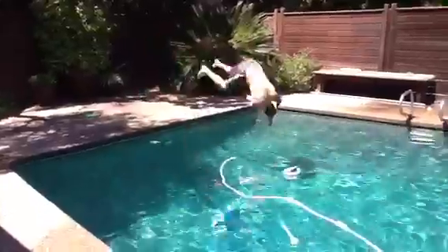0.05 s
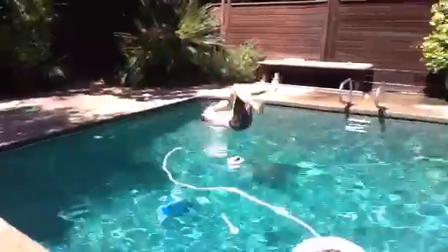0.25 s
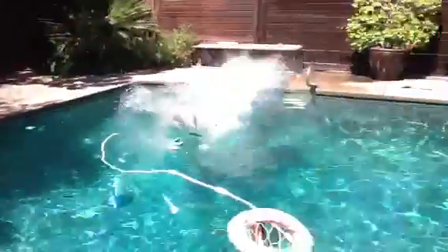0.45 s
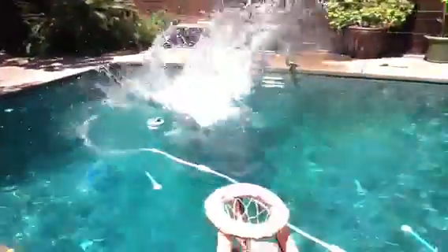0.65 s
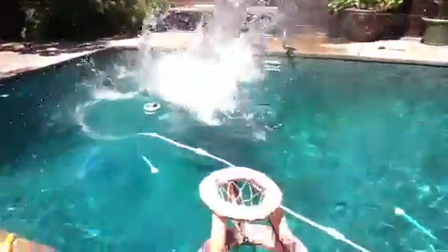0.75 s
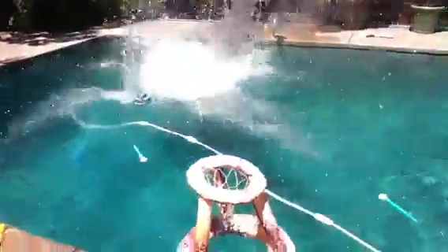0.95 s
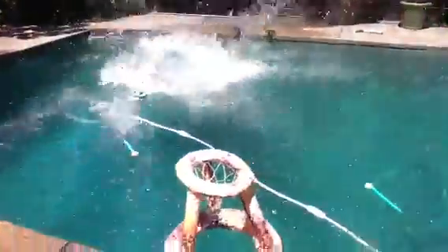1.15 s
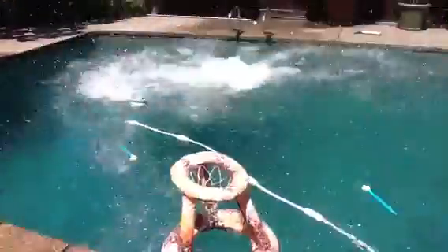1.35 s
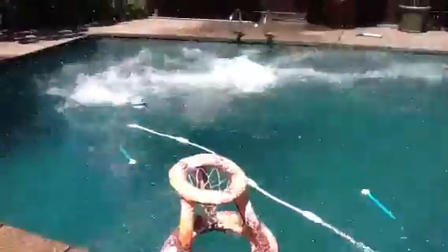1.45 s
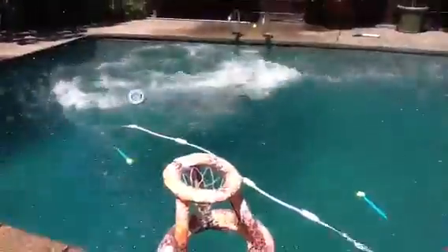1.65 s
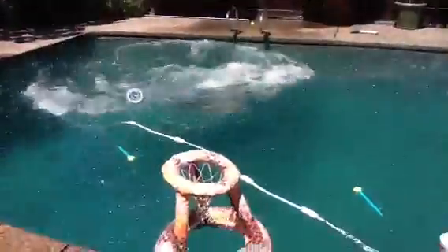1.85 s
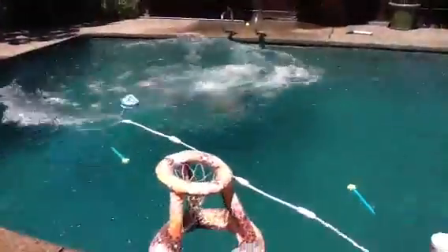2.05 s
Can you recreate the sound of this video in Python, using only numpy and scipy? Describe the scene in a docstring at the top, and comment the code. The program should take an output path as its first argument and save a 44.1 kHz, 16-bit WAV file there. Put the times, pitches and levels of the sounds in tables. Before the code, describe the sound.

A body plunges into an outdoor pool with a sharp slap, bursting splash and low gulps

```python
"""A body drops into an outdoor pool: a sharp slap, a tearing burst as the surface opens, then low gulps.
The slap is a very short pulse with a rattle; the burst and the spray raining back are crowds of tiny rings.
The closing cavity and the fizzing foam are crowds of longer rings; gulps are single tones gliding upward.
Splats and ticks, faint to loud, are puffs of noise through a resonance; a near wall echoes them and the slap.
Faint gurgles come before the plunge, over a quiet outdoor hush; both channels are alike."""
import sys
import numpy as np
from scipy import signal
from scipy.fft import rfft, irfft
from scipy.io import wavfile

SR = 44100
rng = np.random.default_rng(int(sys.argv[2]) if len(sys.argv) > 2 else 0)


def output_pcm(signal):
    """Save a mono or channel-first signal as 16-bit PCM at the path in sys.argv[1].

    Samples are clipped to [-1, 1] before scaling.
    """
    pcm = np.clip(np.atleast_2d(signal).T, -1, 1) * 32767
    wavfile.write(sys.argv[1], SR, np.round(pcm).astype(np.int16))


N = 92610  # samples, 2.1 s


def from_db(db):
    """Turn decibels into a gain."""
    return 10 ** (np.asarray(db) / 20)


def rms_one(x):
    """Scale a sound to an average (rms) strength of 1."""
    return x / np.sqrt(np.mean(x ** 2) + 1e-20)


def in_time(rows):
    """Draw smooth curves from table columns; the level is near silence before the first row."""
    s, level, *rest = np.transpose(rows)
    t = np.arange(N) / SR
    level_curve = np.interp(t, s, level, left=-120)
    return [level_curve] + [np.interp(t, s, column) for column in rest]


def at_hz(points, hz):
    """Read a spectrum table at any pitch, with pitch on a log scale."""
    table_hz, table_db = np.array(points).T
    return np.interp(np.log(hz), np.log(table_hz), table_db)


def drift(rate_hz):
    """Slow random wandering of spread 1: noise smoothed twice, worked out every 40 samples."""
    r = np.exp(-2 * np.pi * rate_hz * 40 / SR)
    noise = rng.standard_normal(N // 40 + 2002)
    slow = signal.lfilter([1], [1, -2 * r, r * r], noise)[2000:]  # drop the filter's start-up
    slow = rms_one(slow - slow.mean())
    return np.interp(np.arange(N) / 40, np.arange(len(slow)), slow)


def ring(clicks, hz, t60):
    """Each unit click starts a sine of height 1 that fades by 60 dB in t60 seconds."""
    r = from_db(-60 / (t60 * SR))
    w = 2 * np.pi * hz / SR
    return signal.lfilter([0, np.sin(w)], [1, -2 * r * np.cos(w), r * r], clicks + 1e-18)


def grains(pitches, per_s, cycles, spread_db, patchy_db):
    """Random uneven impacts shared among resonators; each rms-1 ringing row then flickers in level."""
    sizes = from_db(spread_db * np.minimum(rng.exponential(1, N), 4)) * rng.choice([-1, 1], N)
    impacts = sizes * (rng.random(N) < per_s / SR)
    dealt = rng.integers(0, len(pitches), N)  # which resonator each impact strikes
    together = drift(25)
    rows = []
    for k, hz in enumerate(pitches):
        clicks = np.diff(impacts * (dealt == k), prepend=0)
        flicker = from_db(patchy_db * (.5 * together + drift(18)))
        rows.append(flicker * rms_one(ring(clicks, hz, cycles / hz)))
    return np.array(rows)


def weights(db_rows):
    """Turn decibels into gains whose powers add up to one."""
    gain = from_db(db_rows)
    return gain / np.sqrt(np.sum(gain ** 2, axis=0))


def coloured(colour, low_hz, high_hz, count):
    """Spread resonators evenly in octaves and weigh them by a spectrum."""
    hz = np.geomspace(low_hz, high_hz, count)
    band_db = at_hz(colour, hz) + 10 * np.log10(hz)  # higher bands are wider, so hold more power
    return hz, weights(band_db)[:, None]


def swelling_tones(rows):
    """Tones swell quickly, fade 20 dB over their cycles and end that stretch 6 % higher in pitch."""
    out = np.zeros(N)
    for s, db, hz, cycles in rows:
        t = np.maximum(np.arange(N) / SR - s, 0)
        progress = t * hz / cycles  # 1 once the listed cycles have passed
        shape = (1 - np.exp(-t / .004)) * from_db(-20 * progress)  # 4 ms swell
        out += from_db(db) * shape * np.sin(2 * np.pi * hz * t * (1 + .03 * progress))
    return out


# colour of the outdoor hush: (pitch [Hz], relative level [dB per Hz])
HUSH_COLOUR = [(18, -49), (30, -42), (130, -3), (860, -12.5), (1240, -14.5), (7390, -22.5), (15800, -32)]


def garden():
    """Faint outdoor hush: noise shaped by a spectrum, its level wavering slightly."""
    hz = np.maximum(np.fft.rfftfreq(N, 1 / SR), 1)
    spectrum = rfft(rng.standard_normal(N)) * from_db(at_hz(HUSH_COLOUR, hz))
    return from_db(-55 + 0.5 * drift(27)) * rms_one(irfft(spectrum, N))


# faint low gurgles before the plunge:
# (time [s], level before swell and fade [dB], starting pitch [Hz], fade length [cycles])
EARLY_GURGLES = [(.076, -43.5, 219, 12), (.085, -53, 525, 51), (0.126, -45, 391, 29)]


def gurgles():
    """A few faint low gurgles sound before the plunge."""
    return swelling_tones(EARLY_GURGLES)


# small bubbles in the foam: (time [s], level [dB])
FOAM_LEVEL = [(.21, -62), (.2265, -41), (.26, -60), (.31, -34.5), (.34, -30.5), (.4, -26.5), (.47, -35.5),
              (.51, -31), (.61, -39), (.65, -32), (.75, -36), (.85, -32.5), (1.26, -34.5), (1.52, -33.5),
              (1.6, -40), (2.1, -42.5)]
# colour of the foam: (pitch [Hz], relative level [dB per Hz])
FOAM_SPECTRUM = [(260, 52), (450, 9.5), (508, 3.5), (699, 9), (1800, 7), (2340, -33), (3960, -120)]


def foam():
    """Foam fizzes as many small bubbles ring, each longer than a spray droplet in cycles."""
    hz, gain = coloured(FOAM_SPECTRUM, 450, 2340, count=16)
    small_bubbles = grains(hz, 3000, cycles=19.4, spread_db=0.5, patchy_db=0.5)
    level_db, = in_time(FOAM_LEVEL)
    return from_db(level_db) * np.sum(gain * small_bubbles, axis=0)


# spray striking the surface:
# (time [s], level before a 2.5 dB lift and the mist [dB], mist: treble lift at about 8.3 kHz [dB])
SPRAY_LEVEL = [(.2, -68, 17), (.2245, -44, -1), (.2265, -44.5, 16.5), (.245, -39.5, 8.5), (.302, -34.5, -2),
               (.311, -28.5, -3), (.319, -28, -3), (.3215, -17.5, -4), (.338, -19, -5), (.349, -26, 0),
               (.357, -22, 0), (.372, -20.5, -7), (.382, -26, 0.5), (.395, -21, -8.5), (.42, -28, -5.5),
               (.47, -34, -3.5), (0.5, -35.5, -3), (0.592, -39, -2), (0.852, -32.5, -1), (1.458, -29, 1),
               (1.578, -35, 0), (1.672, -38, 1), (1.858, -43.5, 3.5), (2.1, -37.5, -7.5)]
# colour of the spray without mist: (pitch [Hz], relative level [dB per Hz])
SPRAY_SPECTRUM = [(590, -42), (1000, -5.5), (1640, -2.5), (2070, -1), (2490, -0.5), (3170, -3.5),
                  (4190, -2.5), (11300, -9), (14700, -13), (15800, -8.5)]


def spray():
    """Dense droplets set short rings going; finer mist lifts the treble and coarser spray lowers it."""
    level_db, mist_db = in_time(SPRAY_LEVEL)
    hz, gain = coloured(SPRAY_SPECTRUM, 1000, 15800, count=28)
    # the mist acts from 2.8 kHz up, fully at 8.3 kHz and at most 1.3 times as much above
    share = np.clip(np.log2(hz / 2800) / 1.57, 0, 1.3)[:, None]
    droplets = grains(hz, 18000, cycles=10.2, spread_db=1.5, patchy_db=1.3)
    return from_db(level_db + 2.5) * np.sum(gain * from_db(mist_db * share) * droplets, axis=0)


# large bubbles of the closing cavity, later smaller and higher as it breaks up:
# (time [s], level [dB], centre pitch [Hz])
CAVITY_BUBBLES = [(.21, -56, 347), (.3, -44.5, 337), (.352, -31, 334), (.385, -30, 314), (.47, -33, 259),
                  (.51, -29, 191), (.57, -31.5, 220), (.605, -36, 235), (.63, -30, 216), (.7, -30.5, 245),
                  (.75, -35.5, 257), (1.0, -33, 310), (1.09, -30.5, 322), (1.2, -35.5, 342),
                  (1.33, -30.5, 392), (1.56, -42.5, 324), (2.1, -49.5, 396)]


def cavity():
    """Large bubbles ring low, grouped around a centre pitch that moves with time."""
    level_db, centre_hz = in_time(CAVITY_BUBBLES)
    hz = np.geomspace(110, 620, num=20)
    octaves_off = np.log2(hz[:, None] / centre_hz)
    spread_octaves = 175 / centre_hz  # 4.3 dB weaker at this distance from the centre
    gain = weights(-4.3 * (octaves_off / spread_octaves) ** 2)
    large_bubbles = grains(hz, 1200, cycles=25.3, spread_db=1.0, patchy_db=1.16)
    return from_db(level_db) * np.sum(gain * large_bubbles, axis=0)


# big air pockets that ring out singly:
# (time [s], level before swell and fade [dB], starting pitch [Hz], fade length [cycles])
AIR_POCKETS = [(.24, -27.5, 814, 10), (0.277, -22, 330, 3.3), (0.38, -20.5, 179, 8.3), (.405, -23, 774, 43),
               (.501, -13.5, 159, 4.8), (0.521, -23, 228, 5.5), (.56, -22.5, 234.5, 8.9),
               (0.62, -21, 222, 4.8), (.64, -13, 191, 2.6), (0.645, -10, 930, 5), (0.662, -22, 204, 6.7),
               (0.689, -22.5, 250, 7.3), (1.055, -14.5, 342, 9.7), (1.079, -29, 248, 5.2),
               (1.087, -16, 336, 11.7), (1.329, -21, 500, 39), (1.794, -25, 894, 12.6),
               (1.633, -27, 348, 11), (1.815, -32, 334, 8.5), (2.01, -26.5, 427, 7)]


def gulps():
    """Big air pockets ring out one by one as low, gliding gulps."""
    return swelling_tones(AIR_POCKETS)


# splats and ticks, faint to loud: drops, a hit's lower part, quick repeats:
# (time [s], peak level [dB], pitch [Hz], 60 dB ring length of each resonance [cycles])
SPLATS_AND_TICKS = [(.2075, -40, 4930, 10.0), (.2125, -36, 5100, 12.0), (.2315, -21, 1300, 1.5),
                    (.356, -15, 6500, 7.0), (.3803, -10, 1900, 3.5), (.387, -12, 1850, 4.0),
                    (1.215, -12, 4800, 1.6), (1.2634, -5, 4600, 1.2), (1.2636, -13, 2000, .9),
                    (1.2725, -13, 4500, 1.2), (1.2947, -15, 4500, 1.2), (1.661, -19, 4200, 4.0),
                    (1.684, -19, 4200, 3.5), (1.6885, -22, 3600, 3.0), (1.724, -24, 10000, 2.5),
                    (1.805, -25, 9000, 2.0), (1.928, -25, 9500, 1.8), (1.961, -18.5, 4900, 2.8),
                    (1.966, -28, 5700, 3.5), (2.02, -30, 12000, 6.0), (2.067, -28, 12500, 6.0)]


def splats_and_ticks():
    """Each is a sharp noise puff with a weaker, longer spatter, sent twice through a resonance."""
    out = np.zeros(N)
    for s, db, hz, cycles in SPLATS_AND_TICKS:
        t = np.arange(N) / SR - s
        contact = np.exp(-np.abs(t) / .0005)  # fades over 0.5 ms
        spatter = from_db(-17) * np.exp(-np.abs(t) / .01)  # weaker, fades over 10 ms
        puff = rng.standard_normal(N) * (t >= 0) * (contact + spatter)
        rung_twice = ring(ring(puff, hz, cycles / hz), hz, cycles / hz)
        tick = np.diff(rung_twice, prepend=0)
        out += from_db(db) * tick / np.abs(tick).max()
    return out


def slap():
    """The body's slap: a sharp N-shaped pulse with a short rattle and a slower, lower push."""
    t = np.arange(N) / SR - .22606  # seconds from the slap
    sharp_s, push_s = .000016, .00012  # pulse widths
    rattle = .2 * rng.standard_normal(N) * np.exp(-np.abs(t) / .0003)
    pulse = (.5 - t / sharp_s) * np.exp(.5 - (t / sharp_s) ** 2 / 2)
    push = -t / push_s * np.exp(.5 - (t / push_s) ** 2 / 2)
    return from_db(-2.5) * (rattle + pulse) + from_db(-27) * push


# reflection from the near wall: (delay [s], level [dB])
WALL_ECHOES = [(.0057, -6.5)]


def near_wall(sharp):
    """The wall sends back later, weaker copies of the sharp hits."""
    return sum(from_db(db) * np.pad(sharp, (int(s * SR), 0))[:N] for s, db in WALL_ECHOES)


def scene():
    """Add the water and the wall's echoes to the hush, alike in both channels."""
    sharp = splats_and_ticks() + slap()
    water = gurgles() + foam() + spray() + cavity() + gulps() + sharp
    mono = garden() + water + near_wall(sharp)
    return np.stack([mono, mono])


def record(dry):
    """The microphone loses the deep bass and adds a faint low rumble; the extreme treble is cut."""
    x = signal.sosfilt(signal.butter(4, 111, "high", fs=SR, output="sos"), dry)
    rumble = rms_one(ring(rng.standard_normal(N), 54.6, t60=4.3 / 12))  # noise ringing at 54.6 Hz
    x = x + from_db(-78) * rumble
    return signal.sosfilt(signal.cheby2(24, 90, 15750, fs=SR, output="sos"), x)


dry = scene()
out = record(dry)
output_pcm(out)
```